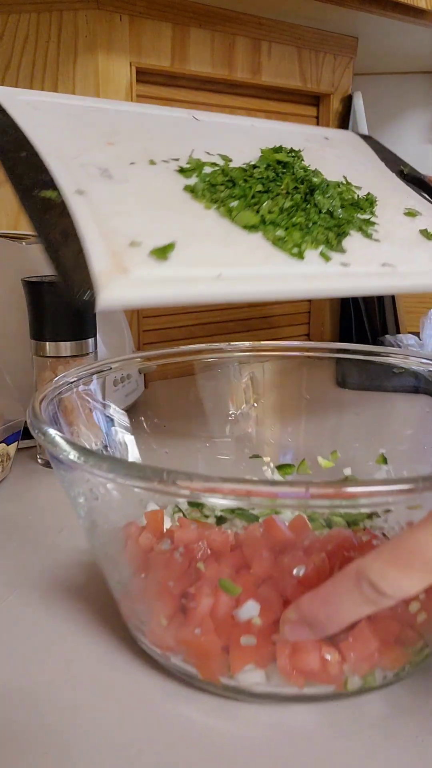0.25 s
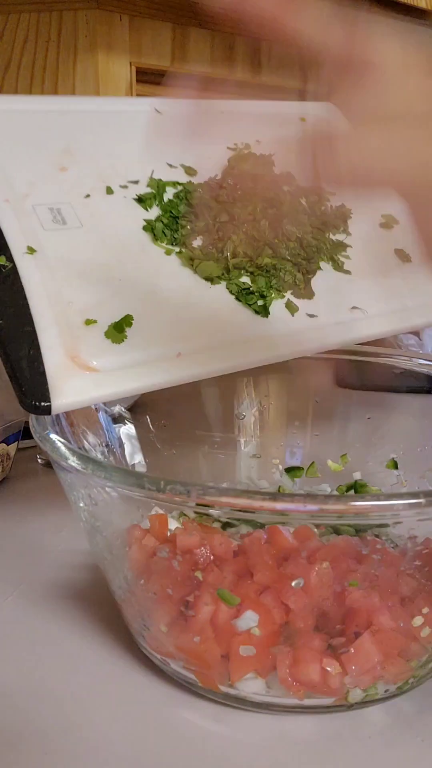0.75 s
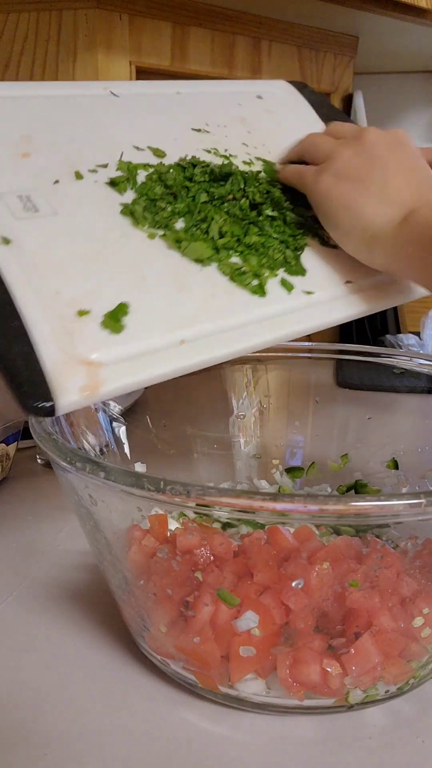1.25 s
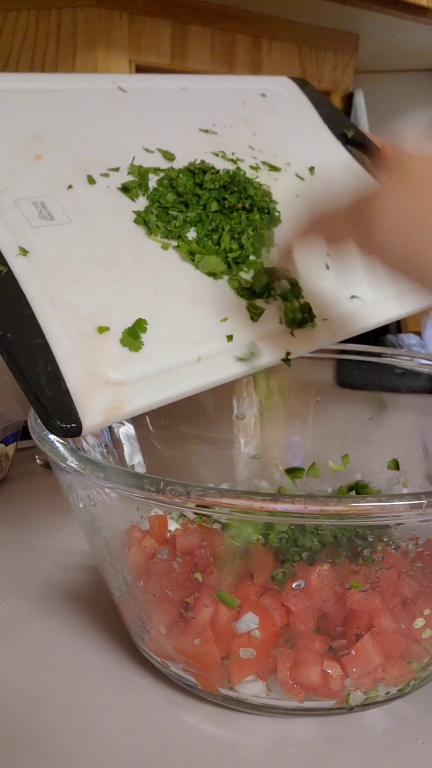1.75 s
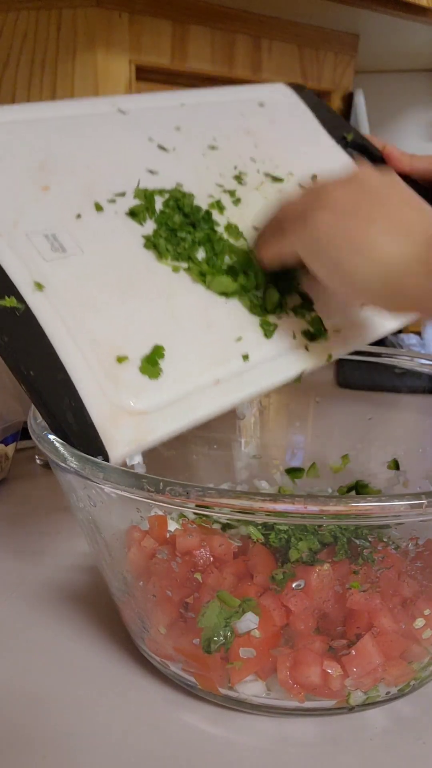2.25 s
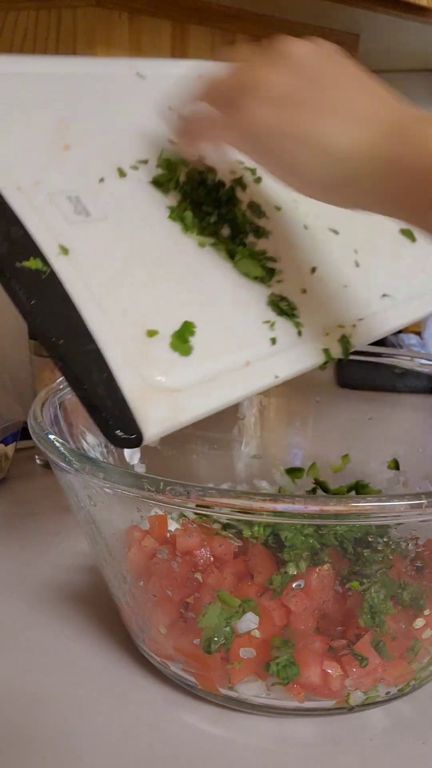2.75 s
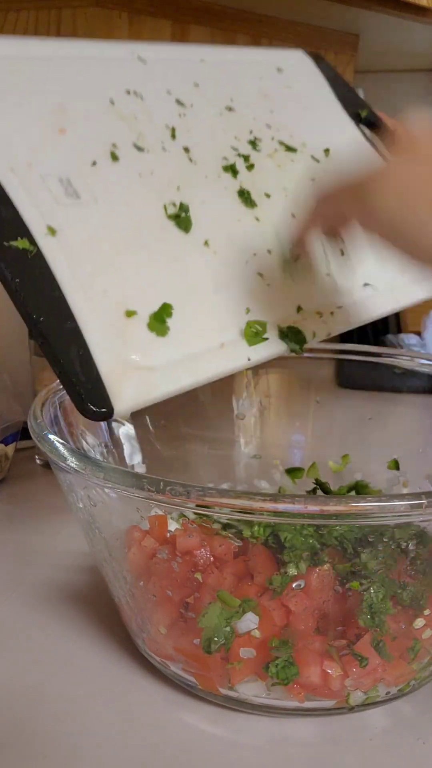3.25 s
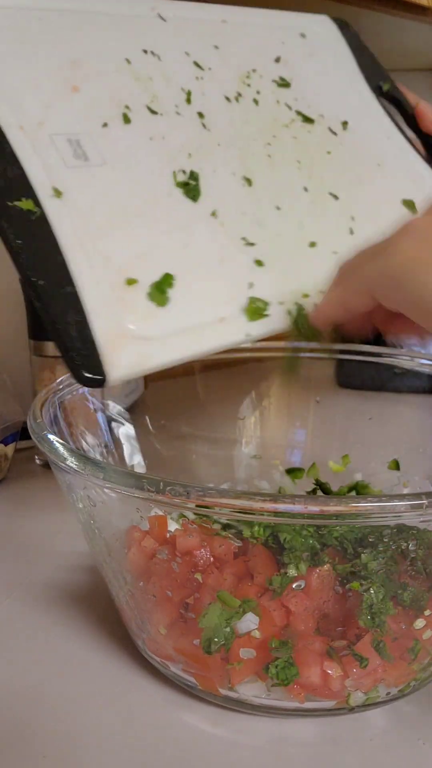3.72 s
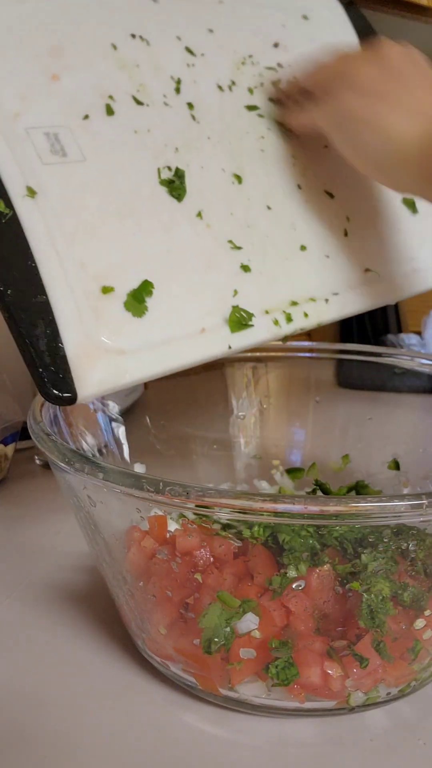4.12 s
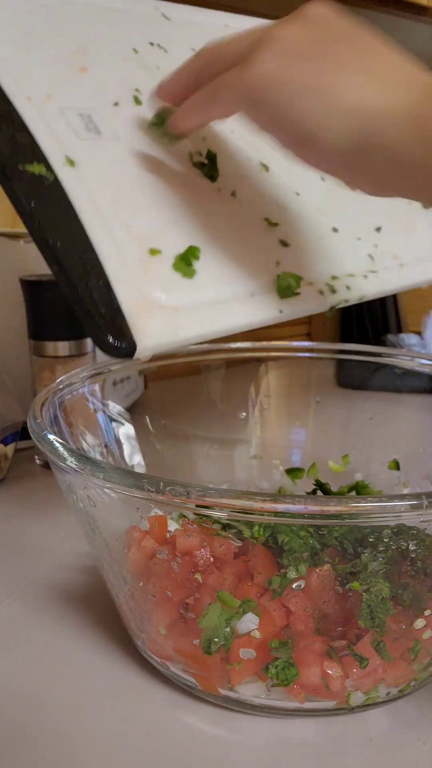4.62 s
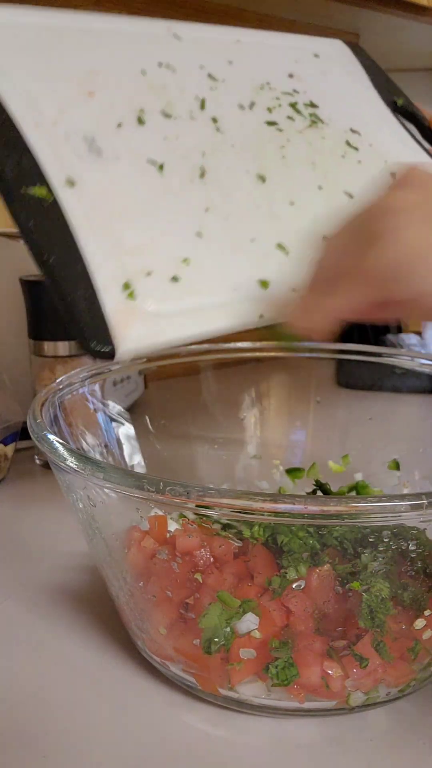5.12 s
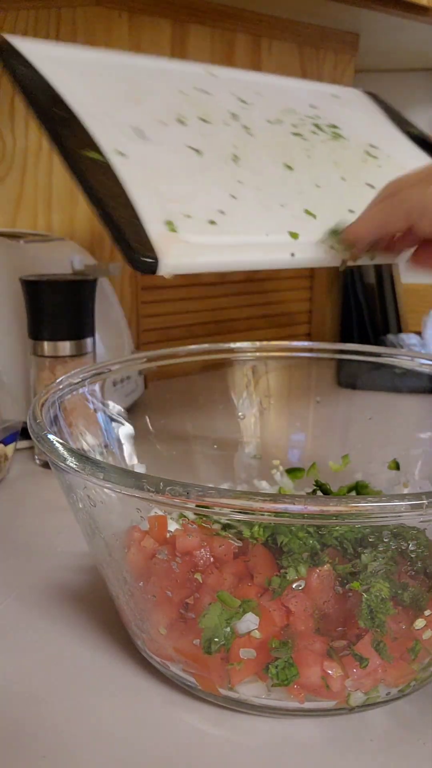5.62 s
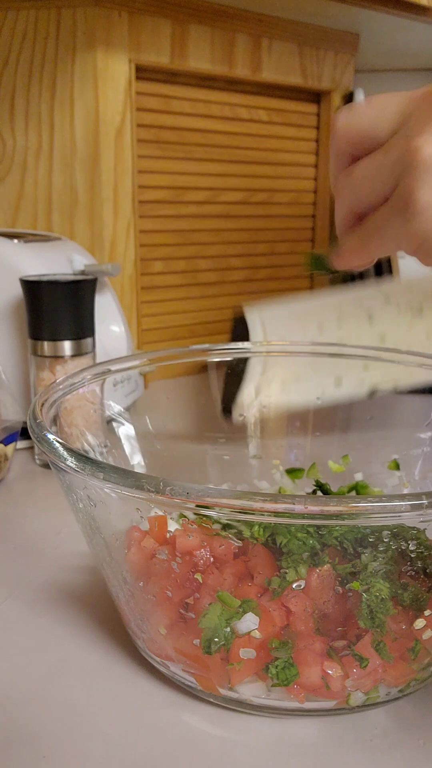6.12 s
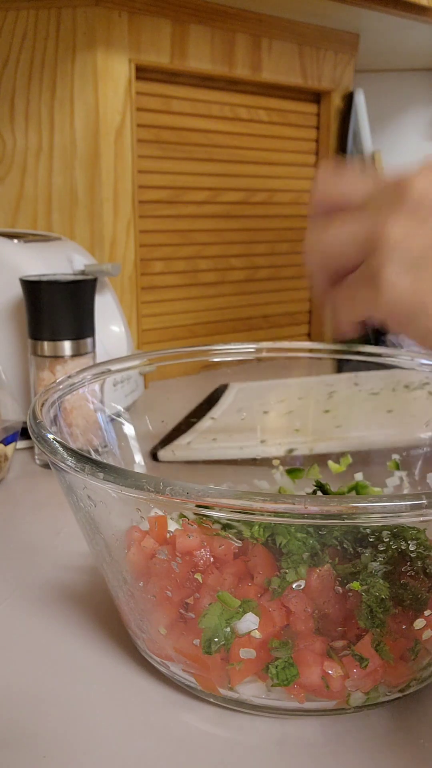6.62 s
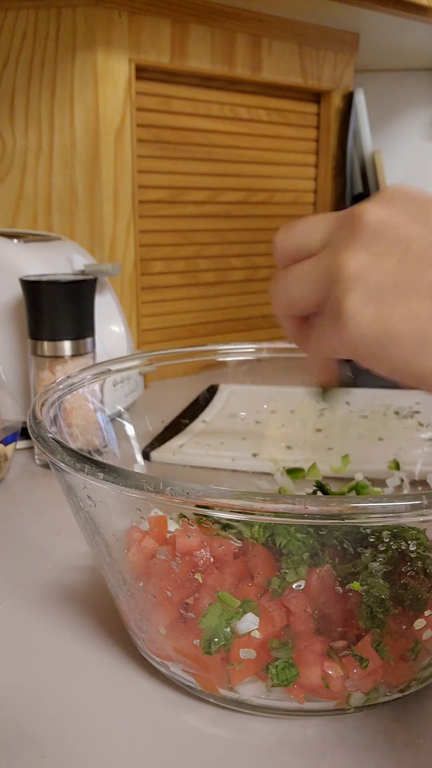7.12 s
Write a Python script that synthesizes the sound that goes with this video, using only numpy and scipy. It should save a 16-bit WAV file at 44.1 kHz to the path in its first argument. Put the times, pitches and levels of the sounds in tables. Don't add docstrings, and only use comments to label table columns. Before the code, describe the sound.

A low fridge hum with deep, steady tones and faint air runs throughout a small, hard kitchen, picked up closely in narrow stereo. At 0.04 seconds a plastic board knocks firmly on the counter, with smaller bumps to 0.25 and light rubbing. At 0.49 comes a sharp, brittle crack; at 0.72 the board touches a glass bowl, which rings briefly, followed by soft thuds. From about 1.2 fingers sweep wet herbs in short gritty hisses, with stronger flicks near 1.75, 2.5 to 2.6, 3.27, 3.87, 4.55, 4.97 and 5.27, small knocks around 1.7, and low soft bumps between. Lighter strokes end around 5.75 to 6.0. After a soft thump at 6.43, the board lands and rocks in a quick hollow clatter from 6.67 to 6.83. A tiny glass jar tink at 6.95 and a faint last tap at 7.27 leave the hum.

```python
import sys
import numpy as np
from scipy import signal
from scipy.fft import rfft, irfft, next_fast_len
from scipy.io import wavfile
from scipy.ndimage import uniform_filter1d, map_coordinates

SR = 44100
rng = np.random.default_rng(int(sys.argv[2]) if len(sys.argv) > 2 else 0)


def ratio_of_db(decibels):
    return 10 ** (np.asarray(decibels, float) / 20)


def store_pcm(level_fs):
    pcm = np.round(np.clip(level_fs, -1, 1) * 32767).astype(np.int16)
    wavfile.write(sys.argv[1], SR, np.atleast_2d(pcm).T)


N = 324576
LEAD = 1400


def unit(x):
    return x / np.sqrt(np.mean(x ** 2) + 1e-20)


def along(points, hz):
    f, v = np.transpose(points)
    return np.interp(np.log(hz + 1), np.log(f + 1), v)


def wobble(rate):
    coarse = np.arange(0, N + 32, 32)
    knots = rng.standard_normal(int(N * rate / SR) + 4)
    return np.interp(np.arange(N), coarse, map_coordinates(knots, [coarse * rate / SR]))


def filtered(x, response):
    m = next_fast_len(x.shape[-1] + 4096)
    spectrum = rfft(x, m) * response(np.fft.rfftfreq(m, 1 / SR))
    return irfft(spectrum, m)[..., :x.shape[-1]]


def colour(x, points):
    shut = [(points[0][0] * .8, -70), *points, (points[-1][0] * 1.15, -70)]
    return unit(filtered(x, lambda hz: ratio_of_db(along(shut, hz))))


def add(track, s, sound):
    part = track[round(s * SR):][:len(sound)]
    part += sound[:len(part)]


def apart(hz):
    # pitch_hz, likeness (1 = same)
    likeness = [(60, 0.87), (180, 0.97), (550, 0.43), (1650, 0.01), (4970, 0.14), (15000, 0.1)]
    turn = np.arccos(np.clip(along(likeness, hz), -1, 1)) / 2
    return np.array([np.cos(turn), np.sin(turn)])


def ports(x, lag_ms, pan_db):
    side = np.array([[1], [-1]])
    delayed = filtered(x, lambda hz: np.exp(-1j * np.pi * hz * side * lag_ms / 1000))
    return delayed * ratio_of_db(side * pan_db / 2)


def fridge():
    # pitch_hz, level_db (rms)
    motor = [(59.2, -57.5), (118.4, -55.5), (236.9, -76), (280, -76.5), (328, -75.5), (441, -82.5),
             (495.3, -73), (684, -84.5), (1174, -91.5), (4926, -101), (7214, -102)]
    # pitch_hz, width_hz, level_db
    casing = [(57, 5.5, -11.5), (118, 1.7, -18.5), (478, 15, -17), (707, 28, -16.5), (4900, 32, -43),
              (7240, 340, -52)]
    # pitch_hz, level_db (per Hz)
    room_air = [(20, -25), (30, -20), (45, -8), (78, -7.5), (100, -13), (210, -16), (300, -21), (600, -26),
                (850, -28.5), (1100, -38), (1700, -42.5), (2600, -58.5), (8000, -63), (9500, -82),
                (16000, -82)]
    air_db = -57.5
    t = np.arange(N) / SR
    lines = np.zeros(N)
    for hz, db in motor:
        strength = ratio_of_db(db + 2.3 * wobble(12)) * np.sqrt(2)
        lines += strength * np.sin(2 * np.pi * hz * t + 0.28 * wobble(10))

    def tone(hz):
        power = ratio_of_db(along(room_air, hz)) ** 2
        for centre, width, db in casing:
            damping = (hz * width) ** 2
            power = power + ratio_of_db(db) ** 2 * damping / ((centre ** 2 - hz ** 2) ** 2 + damping)
        return np.sqrt(power) * apart(hz)

    mid, side = filtered(rng.standard_normal((2, N)), tone)
    air = unit(np.array([mid + side, mid - side]))
    return lines + air * ratio_of_db(air_db + 1.5 + .5 * wobble(3))


def kitchen(x):
    # pitch_hz, fade_s (time to fall 60 dB)
    echo = [(120, 0.35), (500, 0.27), (2000, 0.26), (6000, 0.21), (14000, 0.24)]
    step = SR // 4
    x, out = np.pad(x, (step, 2 * step)), np.zeros((2, N + 2 * SR))
    fade = np.sin(np.pi * np.arange(2 * step) / (2 * step))
    for start in range(0, N + step, step):
        hz, t, z = signal.stft(rng.standard_normal((2, SR // 3)), SR, nperseg=256)
        room = ratio_of_db(-60 * t / along(echo, hz)[:, None])
        nearby = ratio_of_db(12.0 - 60 * t / 0.022)
        mid, side = signal.istft(z * apart(hz)[..., None] * (room + nearby), SR, nperseg=256)[1]
        tail = np.array([mid + side, mid - side])
        tail /= np.linalg.norm(tail, axis=1)[:, None]
        piece = fade * x[start:start + 2 * step]
        wet = signal.fftconvolve(piece[None], tail, axes=1)
        out[:, start:start + wet.shape[1]] += wet
    return out[:, step - 40:step - 40 + N]


def click(spectrum, t60, lead_in_db):
    since = (np.arange(SR // 6) - LEAD) / SR
    lead_in, burst = ratio_of_db(lead_in_db + 60 * since / .045), ratio_of_db(-60 * since / t60)
    return np.where(since < 0, lead_in, burst) * colour(rng.standard_normal(len(since)), spectrum)


def knocks(rows, modes, edge, click_t60):
    push_hz = 300
    pivot_hz = 300
    radiates_hz = 100
    out, t = np.zeros(N), np.arange(SR // 4) / SR
    hz, level, t60 = np.transpose(modes)[:, :, None]
    polarity = np.where(hz < push_hz, 1, (-1) ** np.arange(len(hz))[:, None])
    rise = 1 - np.exp(-t * hz / 0.16)
    for s, db, hardness, click_db in rows:
        strength = level + hardness * np.log2(hz / pivot_hz) + rng.normal(0, 2.5, hz.shape)
        drift = 1 + rng.normal(0, 0.01, hz.shape)
        waves = np.sin(2 * np.pi * hz * drift * t)
        ring = (polarity * rise * ratio_of_db(strength - 60 * t / t60) * waves).sum(0)
        add(out, s, ratio_of_db(db + 0.5) * ring)
        add(out, s - LEAD / SR, ratio_of_db(db + click_db - 0.5) * click(edge, click_t60, lead_in_db=-19.0))
    return filtered(out, lambda f: (1j * f / (radiates_hz + 1j * f)) ** 2)


def counter_knocks():
    # start_s, strength_db, hardness_db (per octave), click_db (over strength)
    hits = [(0.04, -23, 3.5, 1), (0.0432, -18, -1.3, -32), (0.059, -29.5, 1.5, -18.5),
            (0.187, -38, -4.5, -22), (0.203, -38, -3, -32), (0.243, -53, 1, -20), (0.492, -35.5, 3.5, 5.5),
            (0.508, -34, -5.5, -16), (0.842, -46, -2.2, -6.5), (0.887, -53.5, -1.2, -19),
            (1.658, -46, -3.5, -16), (1.694, -40, -1.7, -11), (1.704, -50, 1, -7), (1.744, -47, 4.5, -3)]
    # pitch_hz, level_db, fade_s (time to fall 60 dB)
    counter = [(87.8, -3.5, 0.05), (107, 3, 0.2), (150, 6, .14), (194, -1.5, 0.15), (212, 2.5, .11),
               (286, -3.5, 0.14), (344, -0.5, 0.069), (385.7, -11, 0.14), (505, -4, 0.06),
               (561, 0.5, 0.046), (637, -4, 0.023), (807, -8.5, 0.033), (820, -6.5, 0.068),
               (990, -7, 0.024), (1136, -4.5, 0.032), (1320, -11, 0.047), (1466, -12, 0.039),
               (1760, -15.5, 0.015), (2000, -12, 0.017), (2360, -22, 0.012)]
    # pitch_hz, level_db (per Hz)
    contact = [(880, -35), (1500, 4.5), (2320, -7.5), (4300, -7), (7390, -17), (7920, -26), (16000, -37)]
    return knocks(hits, counter, contact, click_t60=.035)


def snap():
    # start_s, peak_db
    cracks = [(0.49, -14), (0.491, -12), (0.493, -12.5), (0.496, -22.5), (0.501, -29.5)]
    # pitch_hz, level_db (per Hz)
    brittle = [(240, -23.5), (400, -4.5), (949, 0), (2250, -16.5), (2970, -7), (3310, -17), (4440, -10),
               (5430, -32.5), (7750, -6), (9760, -17), (16000, -17)]
    out = np.zeros(N)
    for s, db in cracks:
        add(out, s - LEAD / SR, ratio_of_db(db - 8.5) * click(brittle, t60=0.015, lead_in_db=-28.5))
    return out


def glass(touches, modes, crack_db):
    # pitch_hz, level_db (per Hz)
    ping = [(1500, 21), (4000, 0), (7000, 5.5), (11000, -40.5), (13000, -27)]
    out, t = np.zeros(N), np.arange(SR // 2) / SR
    hz, level, t60 = np.transpose(modes)[:, :, None]
    pair = np.sin(2 * np.pi * hz * t) + 0.14 * np.sin(2 * np.pi * (hz + hz / 150) * t)
    ring = (ratio_of_db(level - 60 * t / t60) * pair).sum(0) * (1 - np.exp(-t / 0.0032))
    for s, db in touches:
        add(out, s, ratio_of_db(db - 1.5) * ring)
        add(out, s - LEAD / SR, ratio_of_db(db + crack_db) * click(ping, t60=0.034, lead_in_db=-7))
    return out


def bowl_rim():
    # start_s, peak_db
    rim = [(0.7198, -40)]
    # pitch_hz, level_db, fade_s (time to fall 60 dB)
    bowl_tones = [(501, -10, .8), (1093, -10, .45), (1841, 0, .46), (2864, -5, .22), (3941, 4, .05),
                  (3950, -14, .14), (5033, -17, .1), (5545, -24, .08), (6578, -20, .07), (7214, -24, .07),
                  (8500, -20, .04), (9750, -19, .04), (10900, -18, .045)]
    return glass(rim, bowl_tones, crack_db=-7.5)


def jar_tink():
    # start_s, peak_db
    tink = [(6.953, -70)]
    # pitch_hz, level_db, fade_s (time to fall 60 dB)
    jar_tones = [(3250, 3, .05), (5100, -8, .04), (5700, 1, .06), (6500, -8, .04), (7400, -8, .04)]
    return glass(tink, jar_tones, crack_db=-4.0)


def board_rocks():
    # start_s, strength_db, hardness_db (per octave), click_db (over strength)
    landings = [(6.429, -43, -4.5, -38.5), (6.485, -65, -5, -9), (6.6705, -45, 1.5, -11.5),
                (6.674, -27, 0, -24.5), (6.705, -30, 1, -16), (6.737, -43.5, -1, -18.5),
                (6.742, -27.5, -1, -25.5), (6.77, -41.5, 5.8, -17), (6.777, -33, -1.5, -26.5),
                (6.807, -39, 0.8, -24.5), (6.828, -37.5, -2.5, -32), (7.273, -57, 3, -9)]
    # pitch_hz, level_db, fade_s (time to fall 60 dB)
    board = [(108.3, -3.5, 0.099), (122.4, -0.5, 0.3), (153.3, 2, 0.16), (217, 1.5, 0.15),
             (287, -10, 0.058), (359, -7.5, 0.2), (395, 2.5, 0.11), (498, -7, 0.071), (585, -5.5, 0.036),
             (660, 7, 0.011), (812, 0, 0.021), (863, -16.5, 0.076), (1030, -21, 0.12), (1330, -12.5, 0.012)]
    # pitch_hz, level_db (per Hz)
    clatter = [(1200, 10.5), (1800, 12.5), (2600, 2), (3200, 10.5), (4300, 1.5), (5800, -7), (7500, -26),
               (9000, -45)]
    return knocks(landings, board, clatter, click_t60=0.082)


def bumps():
    # start_s, peak_db, pitch_hz, fade_s (time to fall 60 dB)
    pushes = [(0.358, -46, 142, 0.077), (0.397, -46.5, 145.6, 0.047), (0.81, -43, 180.5, 0.089),
              (0.851, -39, 267, 0.054), (1.849, -49, 166.5, 0.077), (2.178, -43.5, 199, 0.051),
              (2.328, -43.5, 210, 0.068), (2.531, -50, 225, 0.056), (3.863, -41, 194, 0.078),
              (4.314, -41.5, 222.4, 0.12), (4.337, -56, 213, 0.13), (4.969, -50, 198.3, 0.1),
              (6.06, -50, 144, 0.1), (6.086, -41, 217, 0.053), (6.548, -58, 142, 0.086),
              (6.9, -56, 139, 0.089), (7.039, -53, 170.6, 0.12), (7.17, -64, 146, 0.1)]
    out, t = np.zeros(N), np.arange(SR // 3) / SR
    for s, db, hz, t60 in pushes:
        swell = ratio_of_db(db + 5.5 - 60 * t / t60) * (1 - np.exp(-t / 0.0052))
        add(out, s, swell * np.sin(2 * np.pi * hz * t))
    return out


def grit(per_second, spread_db, streak_db):
    happens = rng.random(N) < per_second / SR
    slips = happens * rng.standard_normal(N) * ratio_of_db(spread_db * rng.exponential(size=N))
    z = signal.stft(slips, nperseg=512)[2]
    streaks = uniform_filter1d(rng.standard_normal(z.shape), size=4, axis=0)
    streaks = uniform_filter1d(streaks, size=10, axis=1)
    return signal.istft(z * ratio_of_db(streak_db * unit(streaks)), nperseg=512)[1][:N]


def strokes():
    # touch_s, lift_s, touch_db (pressure), lift_db (pressure), hiss_db (skin over rub)
    sweeps = [(0.19, 0.182, -76.5, -71, -26.5), (0.247, 0.325, -67, -87.5, -7.5),
              (1.243, 1.5, -61.5, -76.5, -14.5), (1.529, 1.7, -66.5, -53, -7.5),
              (2.216, 2.31, -71, -62.5, -9.5), (2.328, 2.509, -65.5, -62.5, -4),
              (3.065, 3.187, -66.5, -52.5, -7.5), (3.224, 3.304, -56.5, -61.5, -10.5),
              (3.685, 3.85, -58.5, -61, -6), (4.29, 4.505, -64, -69, -10), (4.879, 4.955, -66, -66, -7),
              (5.208, 5.254, -83.5, -65, -2.5), (5.647, 5.732, -71, -69, -5.5),
              (5.82, 6.004, -87, -87, -16)]
    # middle_s, peak_db, length_s, hiss_db and flex_db (over rub)
    flicks = [(1.16, -81, .025, -14, -7), (1.223, -76, 0.0193, -15, 9.5), (1.332, -79, 0.068, -2.5, -3),
              (1.448, -71, 0.049, -20, -6), (1.731, -54, 0.1088, -14, -1), (1.788, -44, 0.0073, -16, -7.5),
              (1.837, -67, 0.023, -18, -1), (2.166, -81, .02, -3, -2), (2.321, -74.5, 0.01, 9, 9),
              (2.522, -50.5, 0.043, -15, -5), (2.545, -48, .08, -14.5, -1.5),
              (2.609, -46.5, 0.008, -33, -4), (3.14, -65, 0.056, 3.5, -16), (3.265, -46, .045, -14, -4),
              (3.628, -90, 0.011, -7, -12), (3.868, -43, 0.039, -14.5, -11), (4.535, -54, 0.019, -9, -9),
              (4.559, -48, 0.035, -18, -7), (4.974, -46.5, 0.034, -17.5, -13.5), (5.201, -81, .02, 2, -18),
              (5.267, -45, 0.0077, -14.5, -25), (5.756, -46, 0.0328, -13.5, -13),
              (4.52, -67.5, 0.014, 3, -10), (4.899, -71, 0.024, 8, 1)]
    # pitch_hz, level_db (per Hz)
    rub_colour = [(2200, -15), (2900, -3.5), (3600, 0), (4300, -2), (5100, -2.5), (5900, -5.5),
                  (6600, -7.5), (7300, -4.5), (8200, -26)]
    skin_colour = [(6500, -13.5), (8200, 7.5), (10000, -2.5), (13000, 1.5), (15800, -3.5)]
    flex_colour = [(400, -10.5), (600, 0), (950, -3.5), (1500, -2.5), (2100, 0), (2500, -12), (3000, -24)]
    land_db_per_s, leave_db_per_s = 480, 600
    bend_db, bend_grows, firm_db = -4, 0.69, -64.5
    peaked = 0.92
    catch = 1.57
    skirt_db, skirt_db_per_length = -13, 16.5
    margin = .12
    rub, hiss, flex = np.zeros((3, N))
    for touch, lift, touch_db, lift_db, hiss_db in sweeps:
        t = np.arange(touch - margin, lift + margin, 1 / SR)
        pressure_db = np.interp(t, [touch, lift], [touch_db, lift_db])
        pressure_db -= land_db_per_s * np.maximum(touch - t, 0)
        pressure_db -= leave_db_per_s * np.maximum(t - lift, 0)
        add(rub, t[0], ratio_of_db(pressure_db))
        add(hiss, t[0], ratio_of_db(pressure_db + hiss_db))
        add(flex, t[0], ratio_of_db(firm_db + bend_db + bend_grows * (pressure_db - firm_db)))
    for s, db, length, hiss_db, flex_db in flicks:
        u = np.arange(-margin, margin, 1 / SR) / length
        u = np.where(u < 0, u * catch, u)
        swell = np.cos(np.pi * np.clip(u, -.5, .5)) ** peaked
        swell = swell + ratio_of_db(skirt_db - skirt_db_per_length * np.abs(u))
        add(rub, s - margin, swell * ratio_of_db(db))
        add(hiss, s - margin, swell * ratio_of_db(db + hiss_db))
        add(flex, s - margin, swell * ratio_of_db(db + flex_db))
    slips = grit(12000, spread_db=1.5, streak_db=1.7)
    uneven = ratio_of_db(1.3 * wobble(60))
    sound = rub * colour(slips, rub_colour) + hiss * colour(slips, skin_colour)
    return uneven * (sound + flex * colour(slips, flex_colour))


def scene():
    near = counter_knocks() + bumps()
    far = board_rocks()
    crack, hand = snap(), strokes()
    bowl = bowl_rim() + jar_tink()
    dry = ports(near, lag_ms=.1, pan_db=-2.5) + ports(far, lag_ms=-0.13, pan_db=0.5)
    dry += ports(crack, lag_ms=.18, pan_db=-6.5) + ports(hand + bowl, lag_ms=-0.19, pan_db=5.0)
    wet = ratio_of_db(-4) * near + ratio_of_db(-11) * crack + ratio_of_db(0.5) * hand
    wet += ratio_of_db(-4) * far + ratio_of_db(-17) * bowl
    return dry + kitchen(wet) + fridge()


def band_limit(x):
    return signal.sosfilt(signal.butter(12, 16810, fs=SR, output="sos"), x)


def record(dry):
    bass_hz, top_hz = 28, 15850

    def band(hz):
        return (1j * hz / (bass_hz + 1j * hz)) ** 2 * np.clip((top_hz - hz) / 150 + .5, 0, 1)

    return band_limit(filtered(dry, band))


dry = scene()
out = record(dry)
store_pcm(out)
```